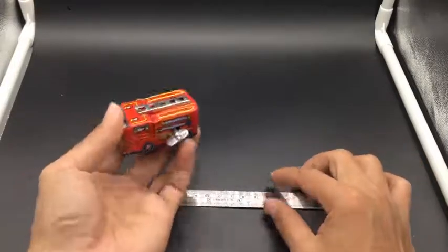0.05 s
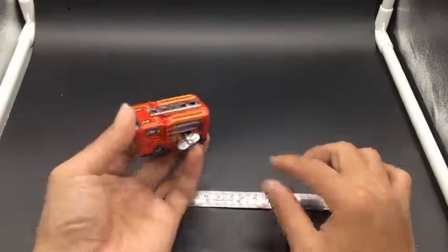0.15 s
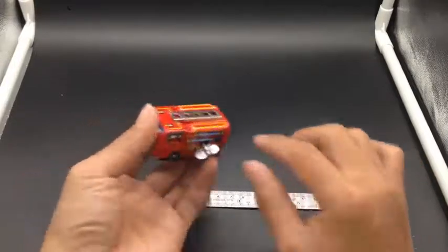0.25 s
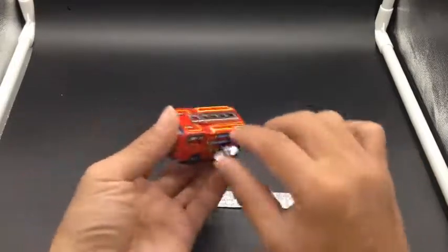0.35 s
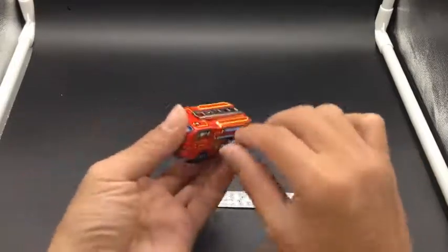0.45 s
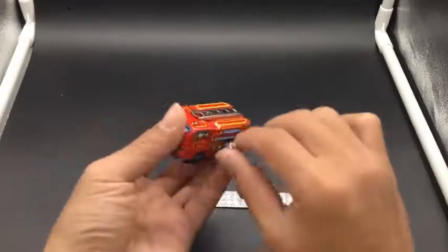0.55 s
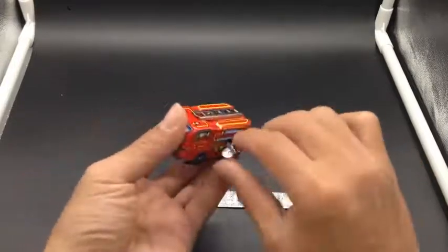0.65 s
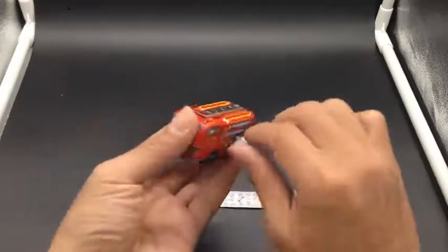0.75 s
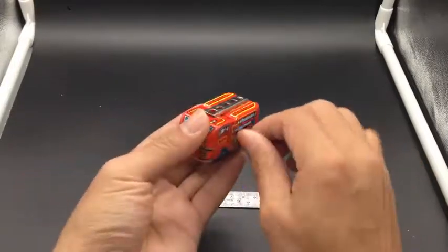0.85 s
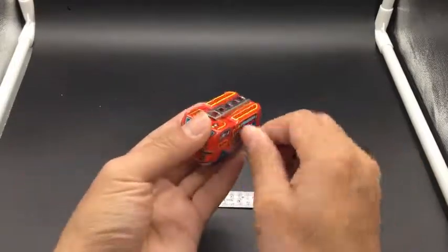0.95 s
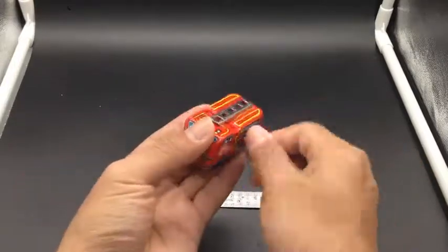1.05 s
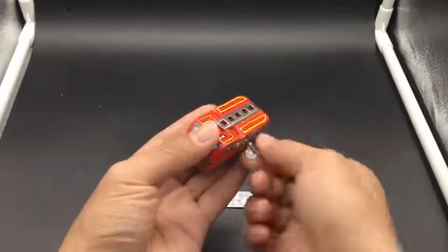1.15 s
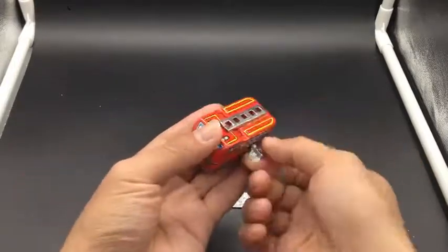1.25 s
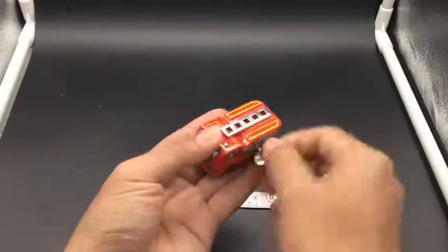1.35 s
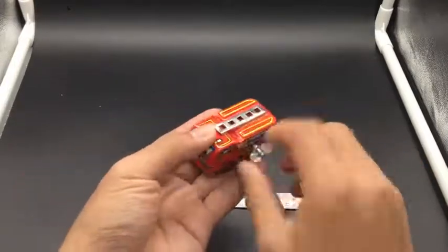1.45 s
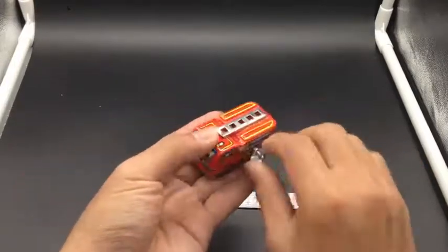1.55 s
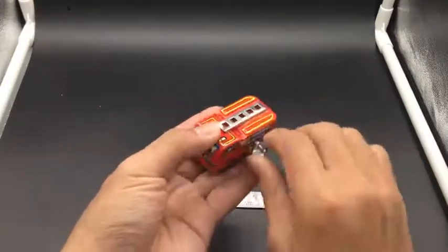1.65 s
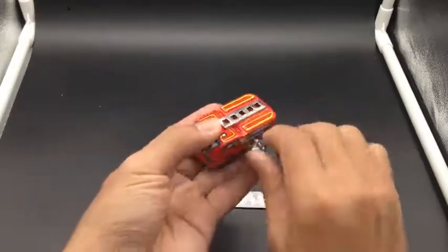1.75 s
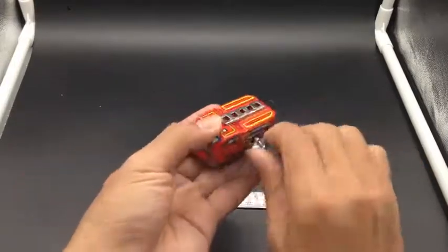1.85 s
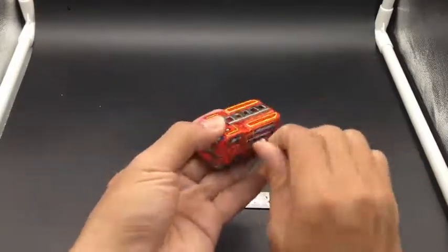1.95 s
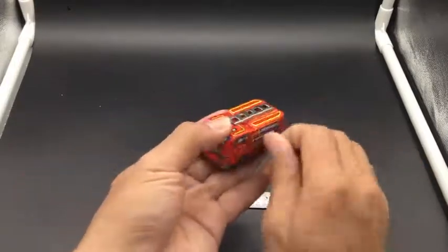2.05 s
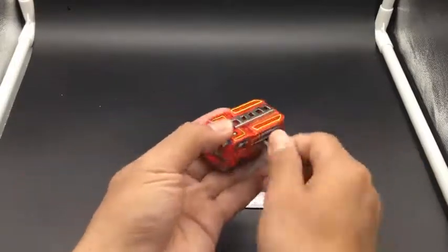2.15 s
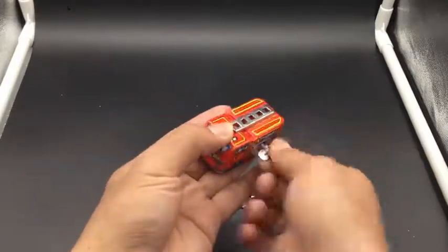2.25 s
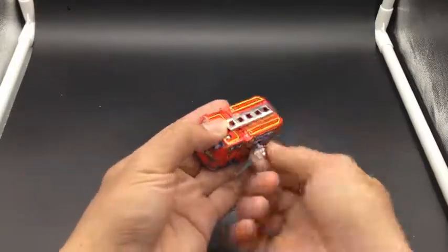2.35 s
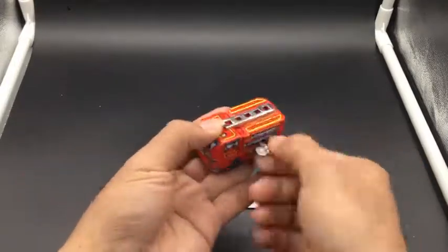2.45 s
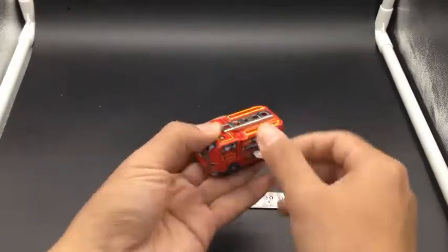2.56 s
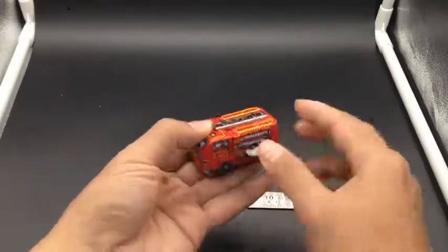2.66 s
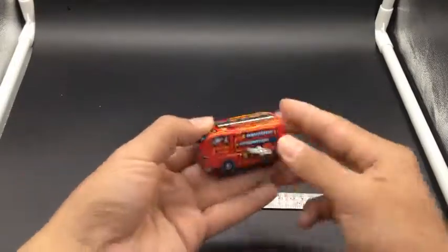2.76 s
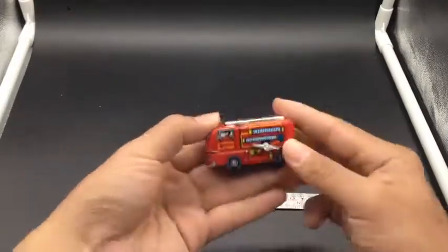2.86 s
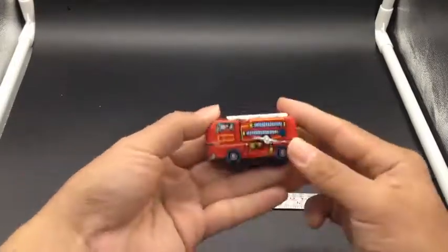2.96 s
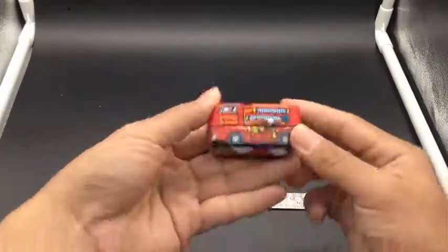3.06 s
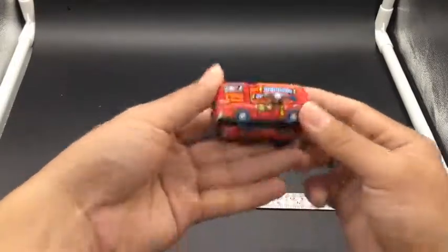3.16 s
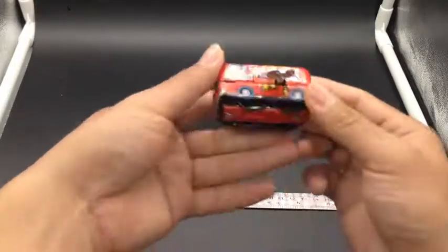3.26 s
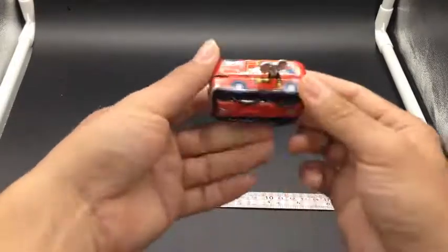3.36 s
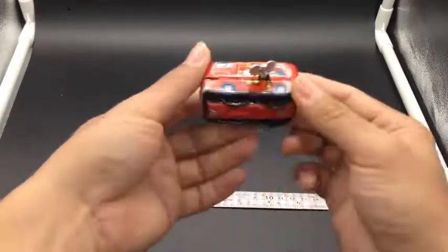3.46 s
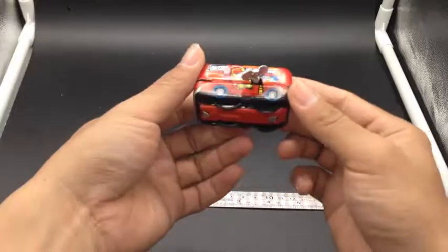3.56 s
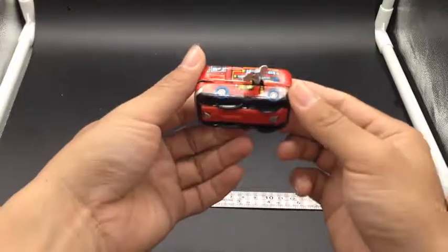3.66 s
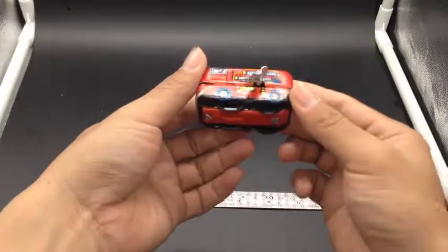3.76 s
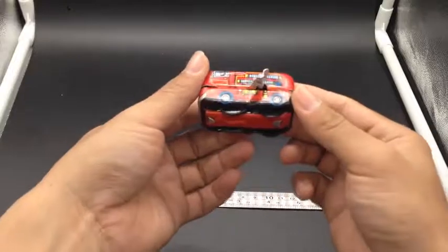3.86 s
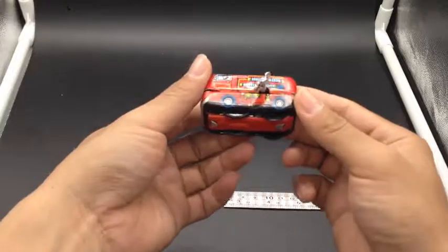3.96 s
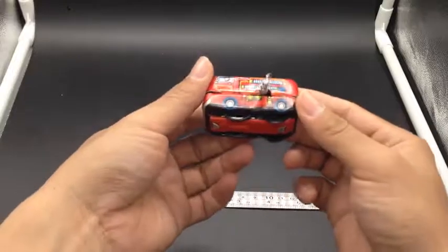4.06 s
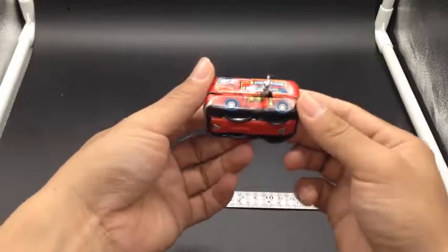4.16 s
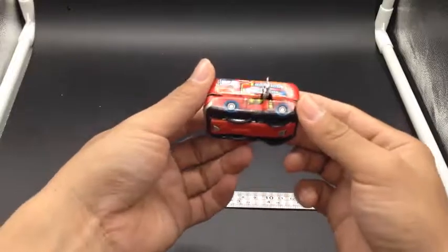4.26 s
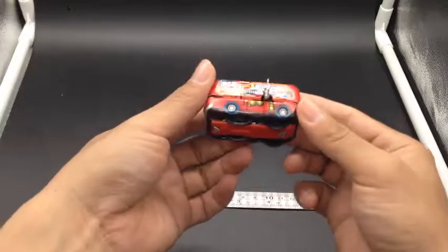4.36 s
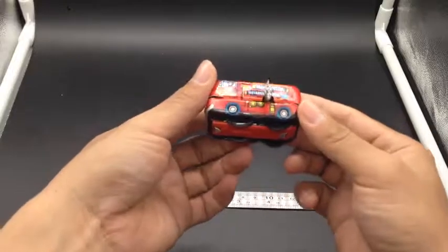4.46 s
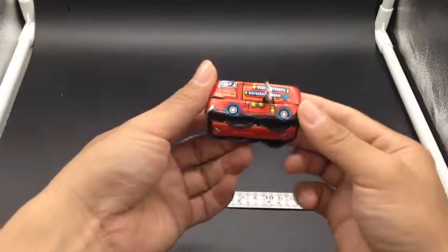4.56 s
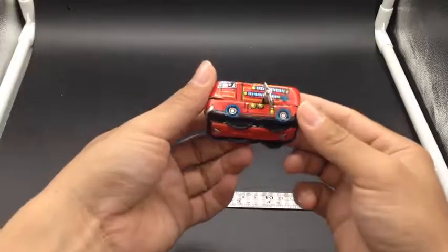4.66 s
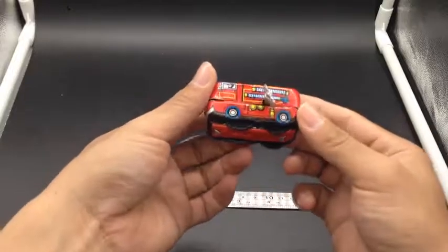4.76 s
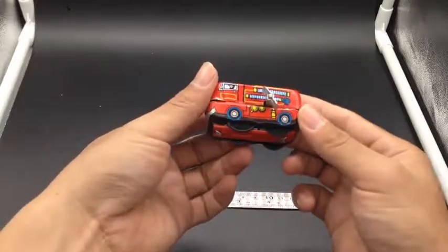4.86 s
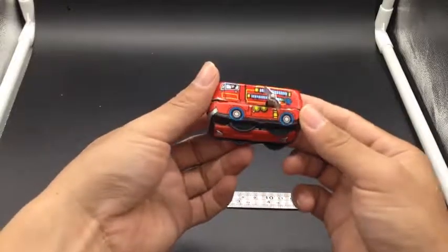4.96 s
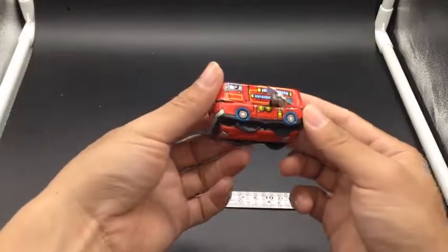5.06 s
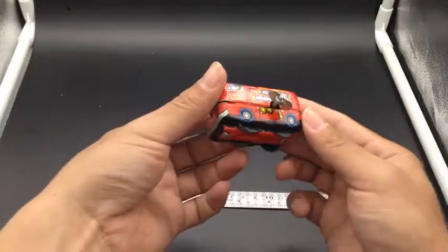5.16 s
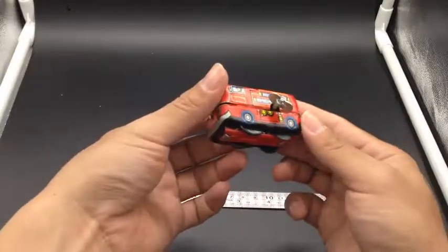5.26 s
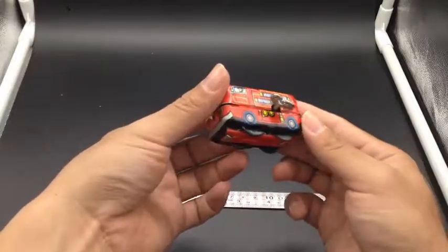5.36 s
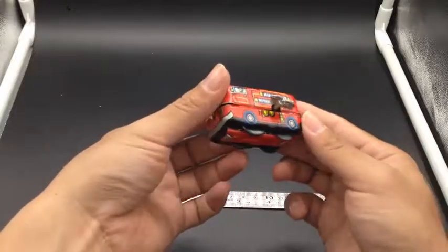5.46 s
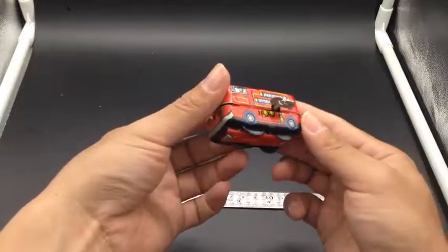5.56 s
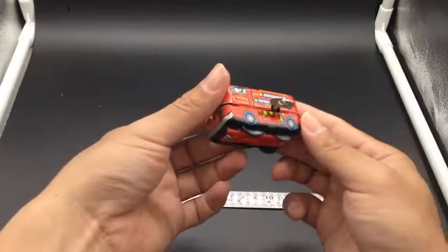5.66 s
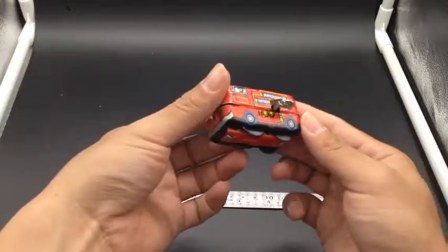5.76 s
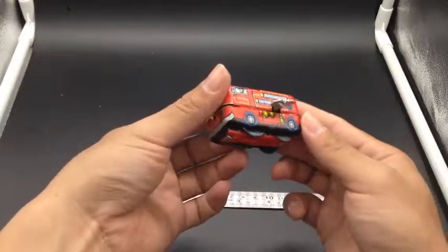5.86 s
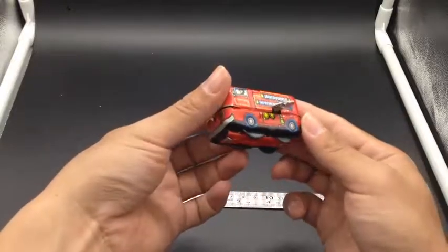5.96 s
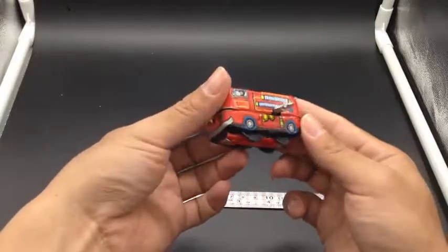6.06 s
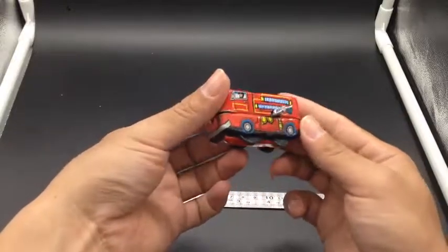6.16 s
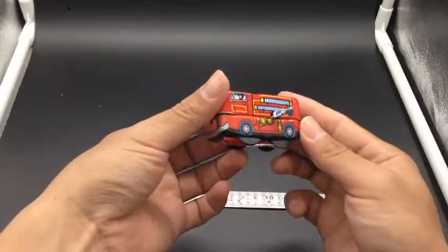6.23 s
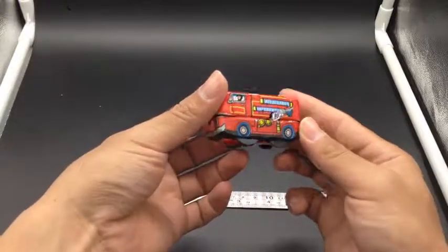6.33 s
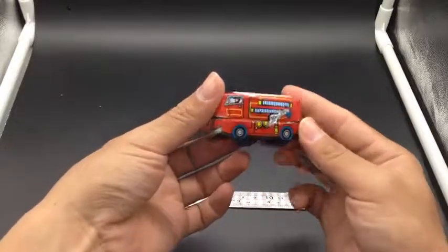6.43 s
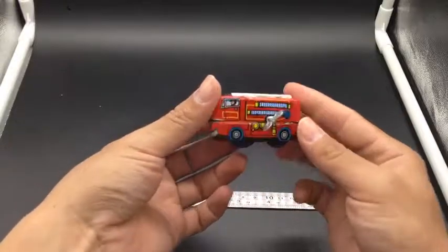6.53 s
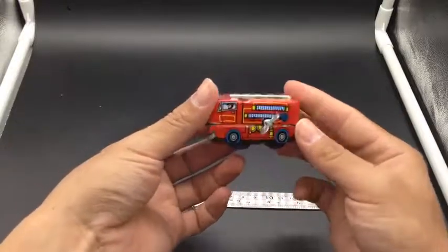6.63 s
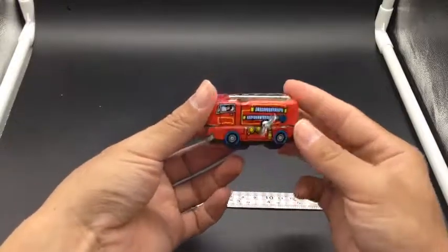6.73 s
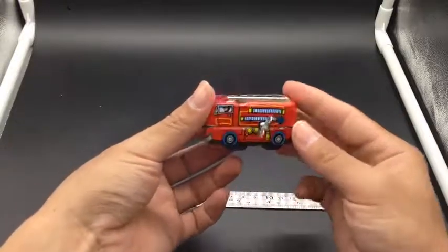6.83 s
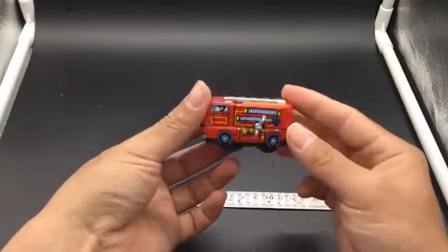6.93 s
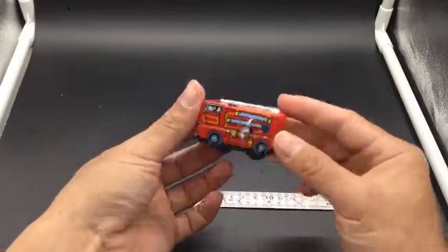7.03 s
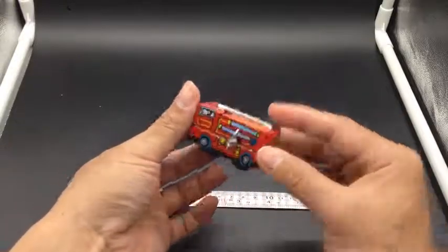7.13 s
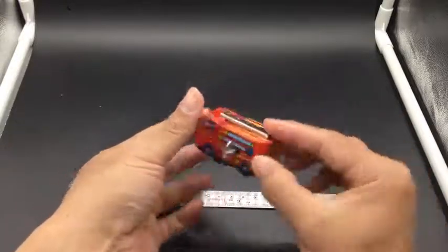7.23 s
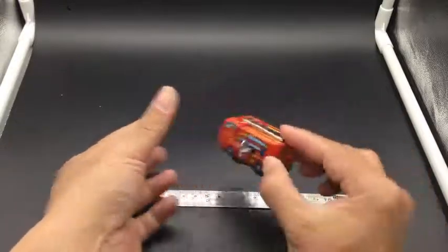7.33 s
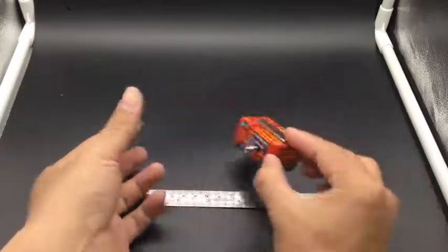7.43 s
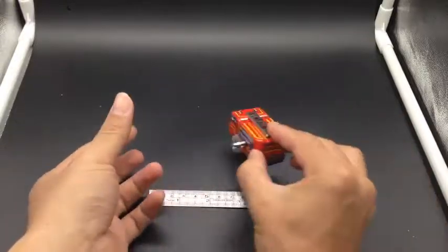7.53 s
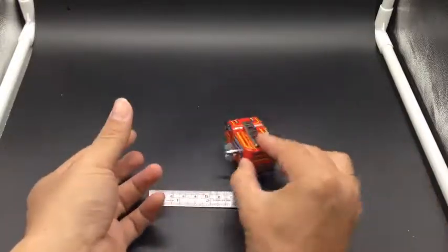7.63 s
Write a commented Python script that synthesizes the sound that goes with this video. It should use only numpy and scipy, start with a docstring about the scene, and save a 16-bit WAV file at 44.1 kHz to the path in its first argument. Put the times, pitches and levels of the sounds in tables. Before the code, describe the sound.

Very close to the microphone in a small dry room, fingers rustle and tap on a small tin wind-up toy. The key is turned in two quick bursts of crisp, uneven ratchet clicks with gritty dragging. After a few light touches the spring is released, and a thin, bright gear whirr runs continuously, slowly weakening and changing colour as the toy is turned.

```python
"""A small tin clockwork toy, held above a table in a small dead room, close to the microphone.
Over room noise and a faint hum, fingers rub and knock the toy and the key rings briefly as it is held.
The key is then wound by hand: the pawl snaps over its ratchet, rings the tin and rebounds; the key drags.
Last the spring is let go: uneven gear-tooth strikes shake frame and shell in a whirr that slowly weakens,
its ring changing as the toy is turned in the fingers, with a near reflection combing it."""
import sys
import numpy as np
from scipy import signal
from scipy.fft import rfft, irfft, next_fast_len
from scipy.io import wavfile
from scipy.ndimage import uniform_filter1d

SR = 44100
rng = np.random.default_rng(int(sys.argv[2]) if len(sys.argv) > 2 else 0)


def wav_out(sig):
    """Save sig, one row per channel (or a flat mono array), as 16-bit PCM at SR to the path in sys.argv[1]."""
    wavfile.write(sys.argv[1], SR, np.round(np.clip(np.atleast_2d(sig).T, -1, 1) * 32767).astype(np.int16))


N = 339129  # samples
TIME = np.arange(N) / SR  # s


def gain_of(db):
    """Decibels to amplitude."""
    return 10 ** (np.asarray(db) / 20)


def evened(x):
    """Scales to unit rms."""
    return x / np.sqrt(np.mean(x ** 2) + 1e-20)


def follow(rows):
    """Each column of a curve after its time column, sample by sample."""
    s, *columns = np.transpose(rows)
    return [np.interp(TIME, s, column) for column in columns]


def add(mix, s, sound):
    """Mixes a sound in at time s, in place."""
    part = mix[round(s * SR):][:len(sound)]
    part += sound[:len(part)]


def colour(x, points, size=2048):
    """Causal minimum-phase filter with the given spectrum, drawn over log frequency."""
    point_hz, point_db = np.transpose(points)
    hz = abs(np.fft.fftfreq(size, 1 / SR))
    db = np.interp(np.log(hz + 1), np.log(point_hz), point_db)
    log_gain = np.log(gain_of(db))
    # the Hilbert transform of the log gain gives the minimum phase
    taps = np.fft.ifft(np.exp(np.conj(signal.hilbert(log_gain)))).real
    return signal.oaconvolve(x, taps[:size // 2])[:len(x)]


def ring(x, hz, width):
    """A fixed resonance of gain 1 at its peak."""
    return signal.lfilter(*signal.iirpeak(hz, hz / width, SR), x)


def steep_ring(x, hz, width):
    """Two alike resonances in series: dark flanks."""
    return ring(ring(x, hz, 1.5 * width), hz, 1.5 * width)


def passed(x, hz, kind, order=2):
    """Low-pass or high-pass filter."""
    return signal.sosfilt(signal.butter(order, hz, kind, fs=SR, output="sos"), x)


def wobble(slow_hz, fast_hz):
    """Random motion of unit rms: nothing below the slow rate, fading above the fast one."""
    size = next_fast_len(N)
    hz = np.fft.rfftfreq(size, 1 / SR)
    spectrum = rfft(rng.standard_normal(size)) * (hz > slow_hz) / (1 + (hz / fast_hz) ** 2)
    return evened(irfft(spectrum, size)[:N])


# spectrum of the quiet room: hz, relative_db_per_hz
ROOM_AIR = [(15, -27.5), (30, -5.5), (60, -4), (130, -2.5), (280, -7.5), (520, -8.5), (800, -17),
            (1400, -20), (2500, -22), (4000, -21), (7000, -25), (13000, -25.5)]
AIR_DB = -63.5
# faint hum: pitch_hz, level_db (rms)
HUM_TONES = [(89.6, -77.5), (179.4, -75.5)]


def air():
    """Steady room noise, and hum tones whose phase drifts a little."""
    hum = np.zeros(N)
    for hz, level_db in HUM_TONES:
        phase = 2 * np.pi * hz * TIME + .4 * wobble(0, 3)
        hum += gain_of(level_db) * np.sqrt(2) * np.sin(phase)
    return gain_of(AIR_DB) * evened(colour(rng.standard_normal(N), ROOM_AIR, size=8192)) + hum


# modes of the tin shell, gripped for winding: pitch_hz, width_hz, relative_db
TIN_MODES = [(1775, 80, 4), (1900, 120, -4), (2150, 110, -1), (2460, 70, -8), (3900, 200, -6),
             (4220, 110, -5), (4660, 90, -12), (5300, 220, -11), (5680, 150, -9), (7230, 200, -12)]


def tin(x, vary_db=-0.5, detune=0.0078):
    """The modes of the gripped shell, a little different at every touch and too small to radiate bass."""
    modes = np.zeros(len(x))
    for hz, width, db in TIN_MODES:
        level_chance, pitch_chance = rng.standard_normal(2)
        modes += gain_of(db + vary_db * level_chance) * ring(x, hz * (1 + detune * pitch_chance), width)
    return passed(modes, 1515, "high", order=4)


# spectrum of metal on metal: hz, relative_db_per_hz
METAL_CRACK = [(150, -42), (700, -21.5), (1000, -12.5), (1450, 1), (1800, 1), (2400, 1), (2900, -19),
               (3400, 1.5), (3900, -2), (4800, -2), (6500, -1.5), (9000, -4.5), (13000, -7.5)]


def crack(x):
    """The broad crack of metal on metal."""
    return colour(x, METAL_CRACK)


# spectrum of skin on skin: hz, relative_db_per_hz
SKIN_RUB = [(100, -16.5), (250, -7), (600, 5), (1200, 2), (2200, -5), (6000, -21.5)]
# fingers slide to a new hold: middle_s, half_length_s, rustle_db on the tin, rub_db of soft skin
FINGER_SLIDES = [(.25, 0.04, -61.5, -64), (.68, 0.29, -72, -70), (1.2, 0.32, -59, -72),
                 (1.45, 0.032, -54, -82), (1.63, .09, -79, -62), (1.95, 0.18, -69.5, -72),
                 (2.66, .04, -69.5, -93), (2.92, 0.035, -67, -80)]
HOLD_RUSTLE_DB, HOLD_RUB_DB = -81.5, -78  # fingers that only hold the toy
TICKS_PER_S, TICK_DB = 18, -8.5  # small random catches of skin on tin, relative to the rustle


def fingers(uneven_db=5.0, dull_hz=5000):
    """Fingers stick and slip on the tin and on each other; each slide swells and fades."""
    on_tin, on_skin = gain_of(HOLD_RUSTLE_DB), gain_of(HOLD_RUB_DB)
    for s, half_length, rustle_db, rub_db in FINGER_SLIDES:
        swell = np.exp(-((TIME - s) / half_length) ** 2)
        on_tin = on_tin + gain_of(rustle_db) * swell
        on_skin = on_skin + gain_of(rub_db) * swell
    slip = rng.standard_normal(N) * gain_of(uneven_db * wobble(29.0, 50))
    rustle = evened(passed(crack(slip), dull_hz, "low", order=1))
    ticks = (rng.random(N) < TICKS_PER_S / SR) * rng.standard_normal(N)
    rustle = rustle + gain_of(TICK_DB) * evened(tin(ticks))
    return on_tin * rustle + on_skin * evened(colour(rng.standard_normal(N), SKIN_RUB))


SHIVER_T60 = .075  # s


def snap(level_db, treble_db, chatter_s=0.009, rise_s=0.0057, tail_db=-12, crack_db=-11.0,
         split_hz=3000, size=4096):
    """A contact lands and chatters for some milliseconds; the tin rings and the loose works shiver after it."""
    t = np.arange(size) / SR
    chatter = np.exp(-(t / chatter_s) ** 2) * rng.standard_normal(size)
    shiver = gain_of(tail_db - 60 * t / SHIVER_T60) * rng.standard_normal(size)
    first_contact = np.exp(-t / .002) * rng.standard_normal(size)
    blow = first_contact + (chatter + shiver) * (1 - np.exp(-t / rise_s))
    sound = gain_of(crack_db) * crack(blow) + tin(blow)
    body = passed(sound, split_hz, "low", order=5)
    edge = passed(sound, split_hz, "high", order=5)
    head = t < .009  # levels are set over the first 9 ms
    sound = body / body[head].std() + gain_of(treble_db) * edge / edge[head].std()
    return gain_of(level_db) * sound / sound[head].std()


# fingers knock the key and the shell: start_s, level_db, treble_db over the shell ring
FINGER_KNOCKS = [(.268, -49.5, -6), (.478, -39.5, 1.5), (.809, -29.5, -6), (.85, -28.5, 7.5),
                 (1.452, -46.5, 13), (1.787, -48, -14), (1.848, -47, -4), (1.867, -33, -1.5),
                 (2.48, -44, -8.5), (2.629, -52.5, 7), (2.826, -61.5, 4), (2.898, -49.5, 1),
                 (2.961, -53, 17), (3.073, -44.5, -15)]
THUD_DB, THUD_HZ, THUD_DECAY_S = -67.5, 230, .02


def knocks():
    """Hard contact of the fingers with key and shell, ringing the tin."""
    out = np.zeros(N)
    for s, level_db, treble_db in FINGER_KNOCKS:
        add(out, s, snap(level_db, treble_db))
    return out


def fingertip_bumps():
    """The soft, dull bump of a fingertip under each knock: decaying low-passed noise."""
    out, t = np.zeros(N), np.arange(SR // 5) / SR
    for s, _, _ in FINGER_KNOCKS:
        bump = evened(passed(rng.standard_normal(len(t)), THUD_HZ, "low"))
        add(out, s, gain_of(THUD_DB) * bump * np.exp(-t / THUD_DECAY_S))
    return out


# the key as the fingers take hold of it: start_s, pitch_hz, level_db (peak), t60_s
KEY_RING = (.812, 1130, -49, .07)


def key_ring():
    """The key rings briefly: one decaying sine."""
    out, t = np.zeros(N), np.arange(SR // 5) / SR
    s, hz, level_db, t60 = KEY_RING
    add(out, s, gain_of(level_db - 60 * t / t60) * np.sin(2 * np.pi * hz * t))
    return out


# pawl drops off a ratchet tooth: start_s, level_db, treble_db over the shell ring,
# rebound_ms after the snap (2 or less for none)
PAWL_SNAPS = [(.925, -25, 0, 0), (.928, -16, 4.5, 0), (.957, -22, 3.5, 14), (1.038, -18, 3, 22.5),
              (1.077, -26, 3, 0), (1.105, -23, -1, 0), (1.13, -22, 3.5, 6.5), (1.162, -18, 3.5, 17.5),
              (1.209, -22, 6.5, 0), (1.233, -20, -3.5, 11.5), (1.263, -23, 5, 0), (1.349, -31.5, -7, 0),
              (1.359, -29.5, 1, 0), (1.372, -22, 5.5, 0), (1.98, -15, -9, 0), (1.984, -14, -0.5, 0),
              (2.087, -22.5, 3, 21.5), (2.134, -25.5, 4, 14.5), (2.176, -25.5, 4, 14.5),
              (2.209, -24.5, 4, 10), (2.246, -24.5, 6, -1), (2.375, -29, 4, -0.5), (2.394, -24.5, 2, 23),
              (2.443, -38, 7, 0)]
REBOUND_DB, REBOUND_TREBLE_DB = -6.5, 2  # a rebound is weaker and brighter than its snap


def ratchet():
    """The pawl snaps over the ratchet teeth and sometimes rebounds."""
    out = np.zeros(N)
    for s, level_db, treble_db, rebound_ms in PAWL_SNAPS:
        add(out, s, snap(level_db, treble_db))
        if rebound_ms > 2:
            rebound = snap(level_db + REBOUND_DB, treble_db + REBOUND_TREBLE_DB)
            add(out, s + rebound_ms / 1000, rebound)
    return out


def drag(start, length, level_db, attack_s=0.0089, sag_db_per_s=83, release_s=0.0066):
    """Level of one drag: the key bites, eases and lets go."""
    t = np.maximum(TIME - start, 0)
    release = np.exp(-np.maximum(t - length, 0) / release_s)
    return np.minimum(t / attack_s, 1) * gain_of(level_db - sag_db_per_s * t) * release


# the key drags under load: start_s, length_s, level_db at the start, before the sag
KEY_DRAGS = [(1.05, 0.23, -36.5), (1.249, 0.036, -28), (2.253, 0.126, -34), (2.412, .03, -36.5)]


def key_drags(scrape_db=-11):
    """Gritty noise of the loaded key, through the tin and as a scrape of metal."""
    grit = rng.standard_normal(N) * gain_of(0.86 * wobble(15, 200))
    scrape = evened(tin(grit, 0, 0) + gain_of(scrape_db) * crack(grit))
    return scrape * sum(drag(*row) for row in KEY_DRAGS)


# push of the unwinding spring: time_s, push_db relative to fully wound
SPRING_PUSH = [(3.25, 0.5), (3.42, -1), (3.85, -1), (4.4, -4), (5.4, -5.5), (7.2, -7), (7.69, -10)]
RELEASE_S, SPIN_UP_S = 3.078, .085  # the spring is let go; time constant of the spin-up


def push():
    """Force on the gear teeth, 1 when fully wound: a quick spin-up, then the spring's slow decline."""
    spin_up = 1 - np.exp(-np.maximum(TIME - RELEASE_S, 0) / SPIN_UP_S)
    return spin_up * gain_of(follow(SPRING_PUSH)[0])


def teeth(rate, jitter=.22, spread_db=1.5, grind_db=-2):
    """Loose gear teeth strike unevenly, each strike a brief noise burst, over a steady grind."""
    turns = np.cumsum(rate * np.exp(jitter * wobble(5, 200))) / SR
    strikes = np.diff(np.floor(turns), prepend=0) * gain_of(spread_db * rng.standard_normal(N))
    contact = signal.lfilter([1], [1, -np.exp(-1 / (0.0014 * SR))], strikes) / np.sqrt(rate)
    grind = gain_of(grind_db) * rng.standard_normal(N)
    return evened(evened(contact) * rng.standard_normal(N) + grind)


def after(s, regrip_s=0.018):
    """A finger's smooth move from 0 to 1 around time s."""
    return .5 + .5 * np.tanh((TIME - s) / regrip_s)


# moments when the gears catch: start_s, level_db over the whirr
GEAR_CATCHES = [(3.3, 1), (3.953, 3.5), (4.105, 1.5), (4.311, 1.5)]


def clatter(decay_s=0.028):
    """Each catch kicks the gear train and dies away; in dB."""
    kicks, t = np.zeros(N), np.arange(SR // 10) / SR
    for s, db in GEAR_CATCHES:
        add(kicks, s, db * np.exp(-t / decay_s))
    return kicks


# spectrum of the gear-tooth rattle: hz, relative_db_per_hz
TOOTH_RATTLE = [(200, -39.5), (520, -17), (780, -21), (1150, -6), (1500, -7), (2520, 0.5), (2850, -3.5),
                (3350, -4), (3750, 4.5), (4450, 4), (4850, 3), (6800, 6), (7600, 3.5), (13000, 2)]
# thin rings of the gear frame: pitch_hz, width_hz, relative_db
FRAME_RINGS = [(3830, 260, -11), (4465, 110, -10), (5290, 220, -15), (8585, 150, -16), (10460, 190, -17),
               (11390, 260, -17), (12980, 200, -17)]
# the shell, held by its ends: pitch_hz, width_hz, relative_db
SHELL_MODES = [(1750, 190, 0), (2060, 240, 0), (2350, 210, -1)]
# two rings that come and go with the grip: pitch_hz, width_hz
WHEEL_RING, AXLE_RING = (4125, 110), (6600, 300)
# each is free for a while and otherwise damped by the grip: start_s, end_s; free_db, damped_db
WHEEL_FREE, AXLE_FREE = (3.26, 5.2), (5.22, 6.45)
WHEEL_DB, AXLE_DB = (-1, -5.5), (-4, -16.5)
# a firm hold damps the shell: start_s, end_s, level_db
SHELL_GRIPPED = (3.4, 6.4, -2.26)
ROOF_TOUCH_S, ROOF_DAMP_DB = 6.88, -15.5  # a fingertip lands on the roof
WHIRR_DB = -24  # gain on the summed layers
TEETH_PER_S, SPEED_EXPONENT = 875, .3  # mean strikes at full push; speed goes as a power of the push
LOW_MODE_DB = 2.5  # boost of the lowest shell mode over the highest, fully wound
# dB per dB of push, on top of the whirr's own fall
SHELL_GROWTH, LOW_MODE_GROWTH, RING_GROWTH, FRAME_GROWTH = -0.18, 1.39, 0.31, 0.33
RING_BUILD_S = .17  # frame, wheel and axle rings only bloom as the gears reach full speed


def whirr(rattle_db=2.5, shell_db=-5.5, frame_db=3, flutter_db=-0.44, throb_db=1.1):
    """The gear train shakes frame and shell; speed, level and colour all follow the push of the spring."""
    force = push()
    push_db = 20 * np.log10(np.maximum(force, .1))
    rate = TEETH_PER_S * gain_of(SPEED_EXPONENT * push_db)
    out = gain_of(rattle_db) * evened(colour(teeth(rate), TOOTH_RATTLE))

    frame_drive = teeth(rate)
    frame = sum(gain_of(db) * evened(steep_ring(frame_drive, hz, width)) for hz, width, db in FRAME_RINGS)
    bloom = np.clip((TIME - RELEASE_S) / RING_BUILD_S, 0, 1)
    out += gain_of(frame_db + FRAME_GROWTH * push_db) * bloom * frame

    # a fingertip on the roof damps the lowest shell mode most, the highest not at all
    lowest_db = LOW_MODE_DB + LOW_MODE_GROWTH * follow(SPRING_PUSH)[0] + ROOF_DAMP_DB * after(ROOF_TOUCH_S)
    shell, power = np.zeros(N), np.zeros(N)
    for (hz, width, db), share in zip(SHELL_MODES, np.linspace(1, 0, len(SHELL_MODES))):
        size = gain_of(db + lowest_db * share ** 2)
        shell += size * evened(steep_ring(teeth(rate), hz, width))
        power += size ** 2
    held_from, held_until, held_db = SHELL_GRIPPED
    hold_db = held_db * (after(held_from) - after(held_until))
    out += gain_of(shell_db + hold_db + SHELL_GROWTH * push_db) * shell / np.sqrt(power)

    ring_drive = teeth(rate) * gain_of(throb_db * wobble(25, 80))
    rings = (WHEEL_RING, WHEEL_FREE, WHEEL_DB), (AXLE_RING, AXLE_FREE, AXLE_DB)
    for (hz, width), (start, end), (free_db, damped_db) in rings:
        grip_db = damped_db + (free_db - damped_db) * (after(start) - after(end))
        sound = evened(steep_ring(ring_drive, hz, width))
        out += gain_of(grip_db + RING_GROWTH * push_db) * bloom * sound
    return out * force * gain_of(WHIRR_DB + clatter() + flutter_db * wobble(8.9, 31))


# nearest reflection as the toy is raised and lowered: time_s, lag_ms
ECHO_LAG = [(3.2, 2.4), (3.35, 3), (6.25, 3), (6.55, 2.35), (7.2, 2.35), (7.5, 2.05)]
ECHO_FULL_MS = 0.79  # the reflection's gain is this over its lag


def near_echo(x, echo_hz=4200):
    """A near, dulled reflection combs the whirr; it comes sooner and stronger as the toy is lowered."""
    lag_ms = follow(ECHO_LAG)[0]
    dulled = signal.sosfiltfilt(signal.butter(2, echo_hz, fs=SR, output="sos"), x)
    return x + ECHO_FULL_MS / lag_ms * np.interp(TIME - lag_ms / 1000, TIME, dulled)


def patches(z, depth_db, hz, seconds):
    """Random swells of about this width and duration over short-time spectra."""
    field = rng.standard_normal(z.shape)
    for axis, span in enumerate((hz * 512 / SR, seconds * SR / 128)):  # in bins, then frames
        size = max(1, round(span))
        field = uniform_filter1d(uniform_filter1d(field, size, axis), size, axis)
    return z * evened(gain_of(depth_db * evened(field)))


def wandering_colour(x):
    """The whirr's colour wanders at random: slow narrow swells, and brief broad ones."""
    z = signal.stft(x, nperseg=512, noverlap=384)[2]
    z = patches(z, depth_db=1.7, hz=180, seconds=.3)
    z = patches(z, depth_db=1.4, hz=1100, seconds=.012)
    return signal.istft(z, nperseg=512, noverlap=384)[1][:N]


# the tin radiates poorly between its two groups of modes: pitch_hz, width_hz, depth_db
HOLLOW = (2800, 330, -4)


def hollow(x):
    """The dip between the shell's modes and the frame's."""
    hz, width, depth_db = HOLLOW
    return x - (1 - gain_of(depth_db)) * ring(x, hz, width)


def reflections(x, t60, size=12000):
    """A decaying tail of sparse echoes with unit energy."""
    t = np.arange(size) / SR
    taps = rng.standard_normal(size) * (rng.random(size) < .25) * gain_of(-60 * t / t60)
    return signal.oaconvolve(x, taps / np.linalg.norm(taps))[:N]


def scattered(x):
    """Sound arriving from the sides: the same bursts and colour with unrelated phases."""
    z = signal.stft(x, nperseg=128)[2]
    turned = z * np.exp(2j * np.pi * rng.random(z.shape))
    return x.std() * evened(signal.istft(turned, nperseg=128)[1][:N])


# stereo width: hz, side_over_mid_db
STEREO_WIDTH = [(3700, -55), (4200, -15), (4900, -8.5), (8000, -7.5), (10500, -11), (13000, -20)]


def scene(room_db=-27):
    """The toy in a small dead room; only the treble spreads sideways."""
    running = wandering_colour(near_echo(whirr()))
    hard_parts = hollow(fingers() + knocks() + ratchet() + key_drags() + running)
    toy = hard_parts + fingertip_bumps() + key_ring()
    mid = toy + gain_of(room_db) * reflections(toy, t60=0.12) + air()
    side = passed(colour(scattered(mid), STEREO_WIDTH), 4150, "high", order=16)
    return np.array([mid + side, mid - side])


EDGE_HZ = 13090


def record(dry):
    """A steep low-pass: nothing sounds above about 13 kHz."""
    taps = signal.firwin(601, EDGE_HZ, window=("kaiser", 6), fs=SR)
    return signal.oaconvolve(dry, taps[None], "same")


dry = scene()
out = record(dry)
wav_out(out)
```